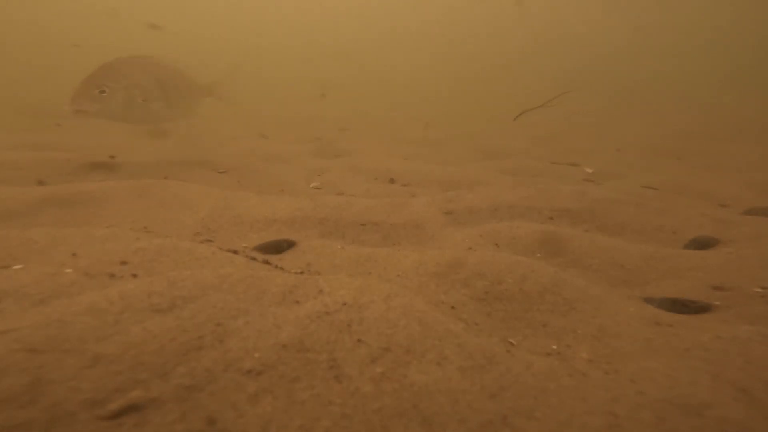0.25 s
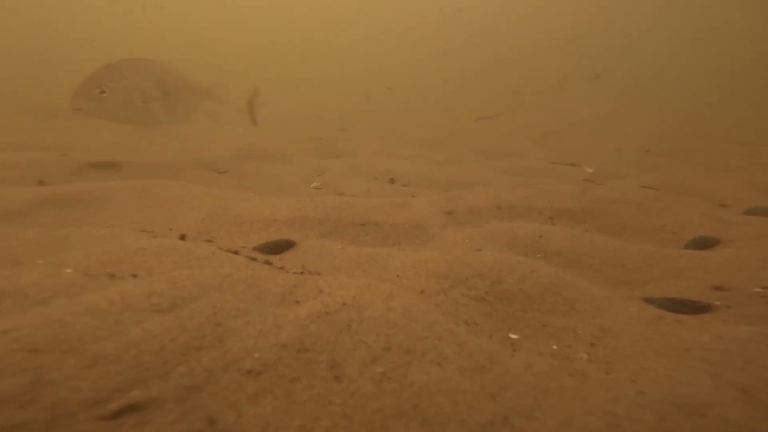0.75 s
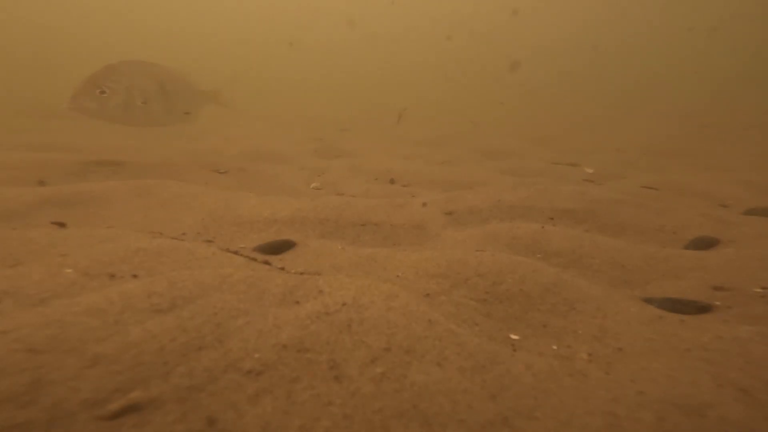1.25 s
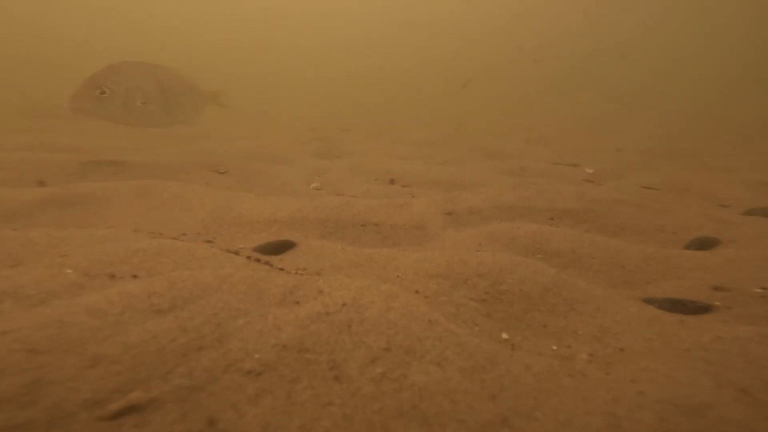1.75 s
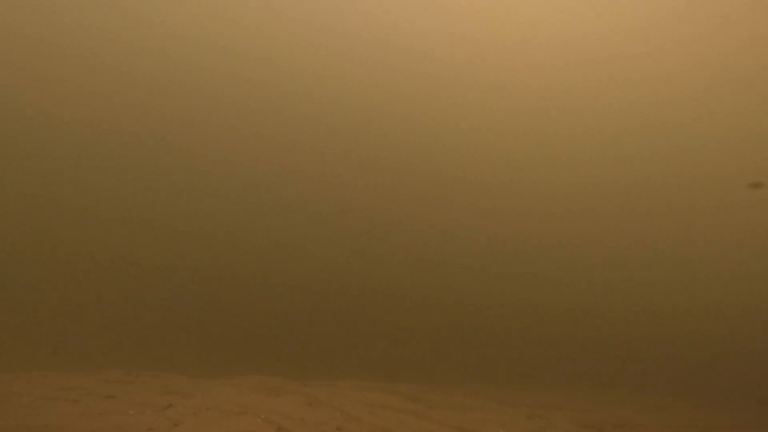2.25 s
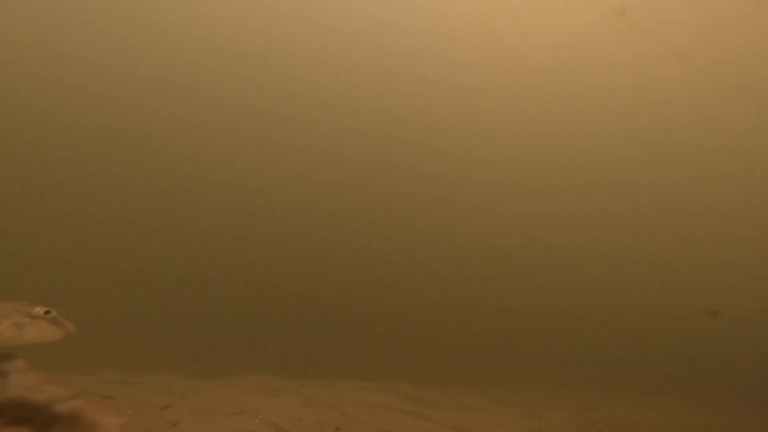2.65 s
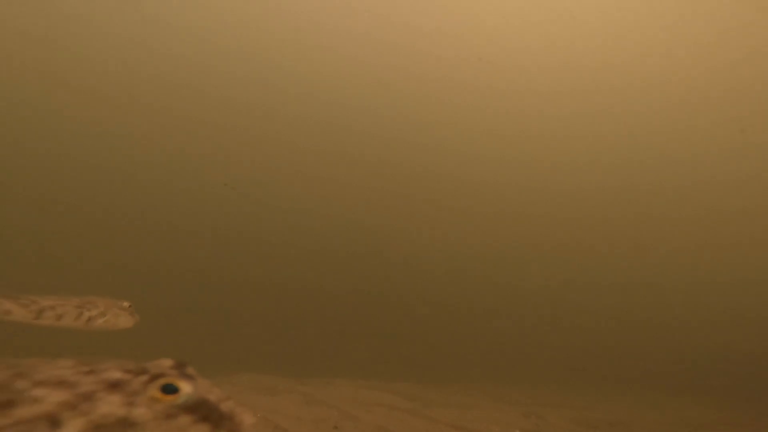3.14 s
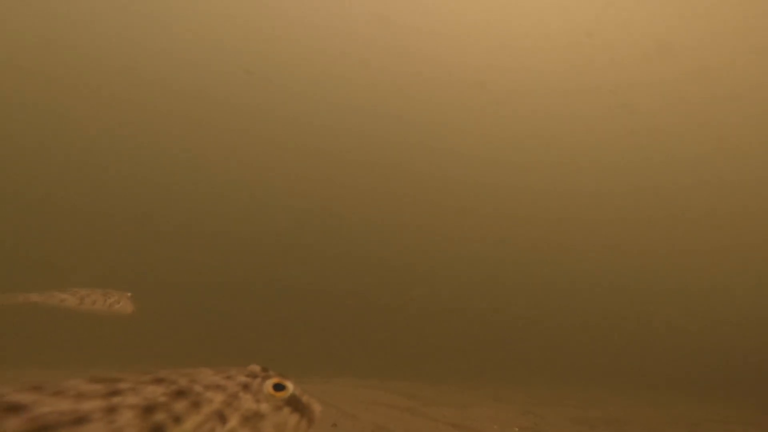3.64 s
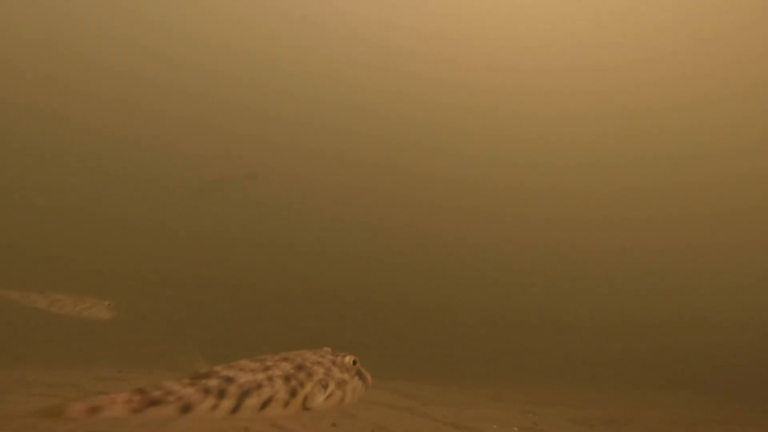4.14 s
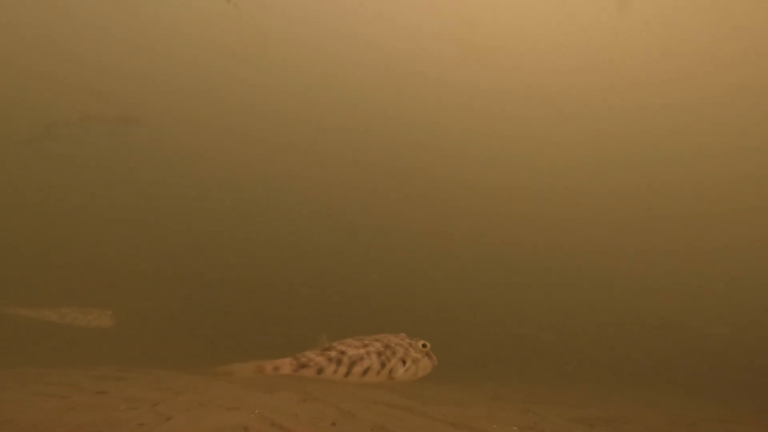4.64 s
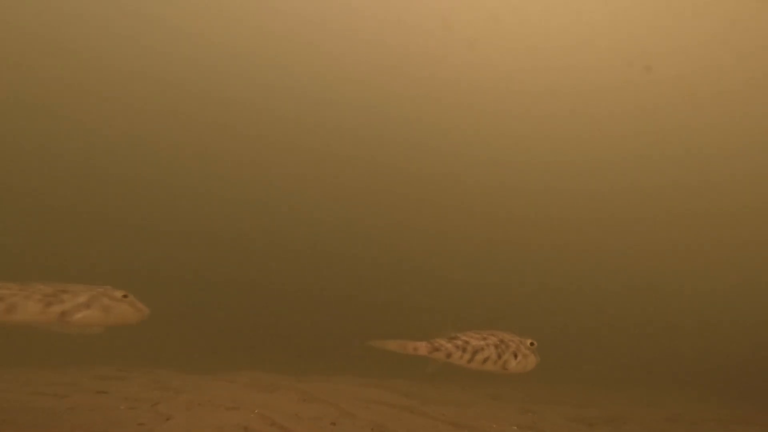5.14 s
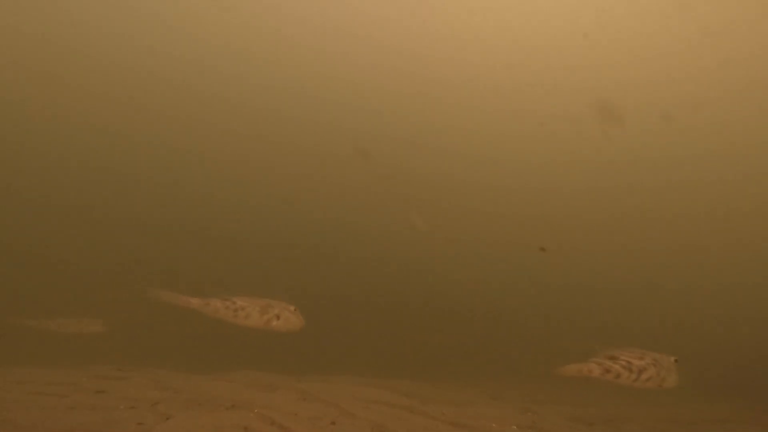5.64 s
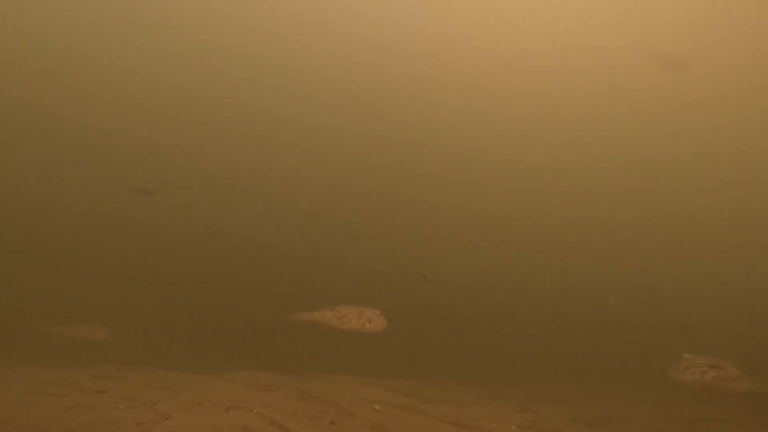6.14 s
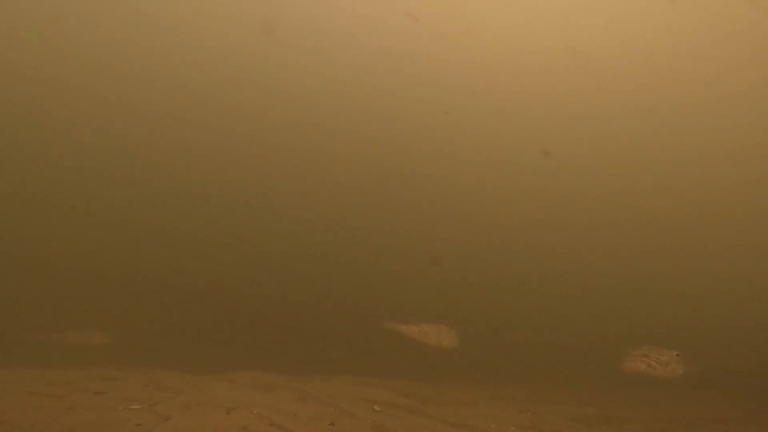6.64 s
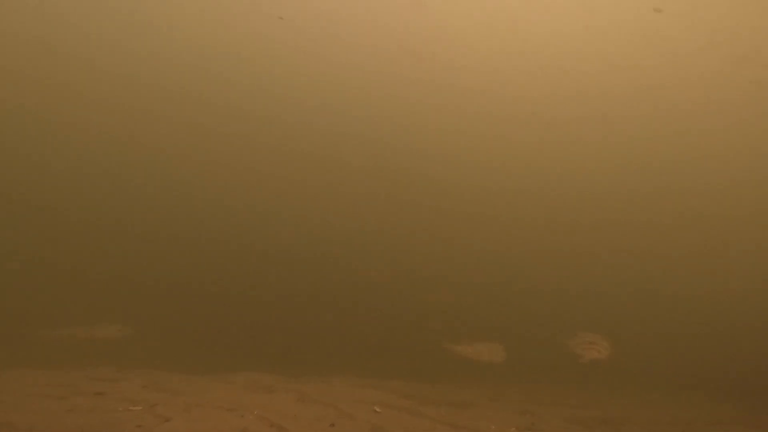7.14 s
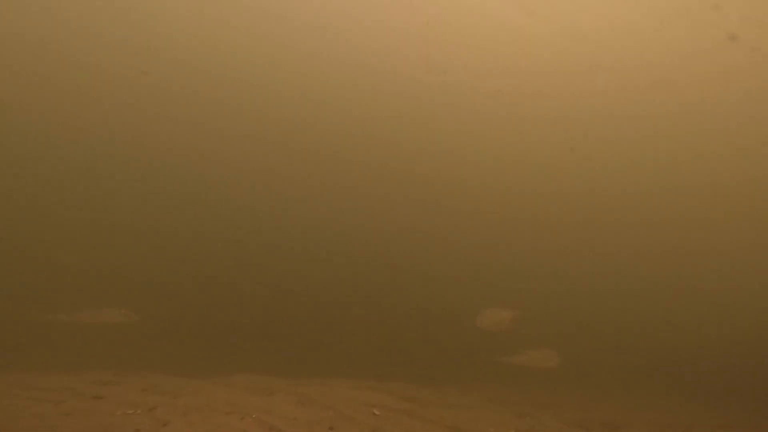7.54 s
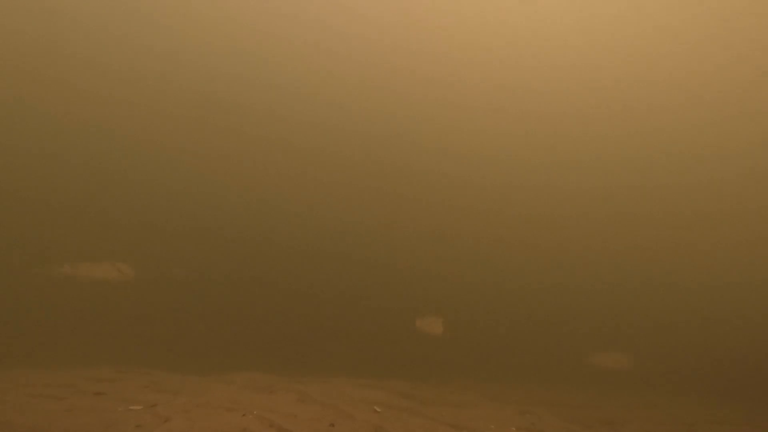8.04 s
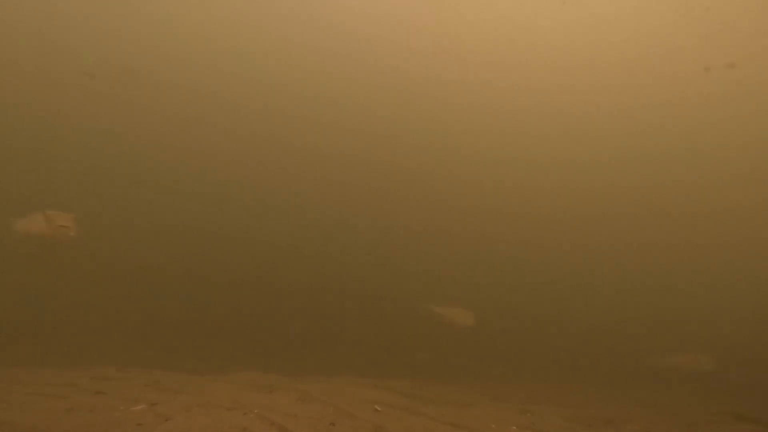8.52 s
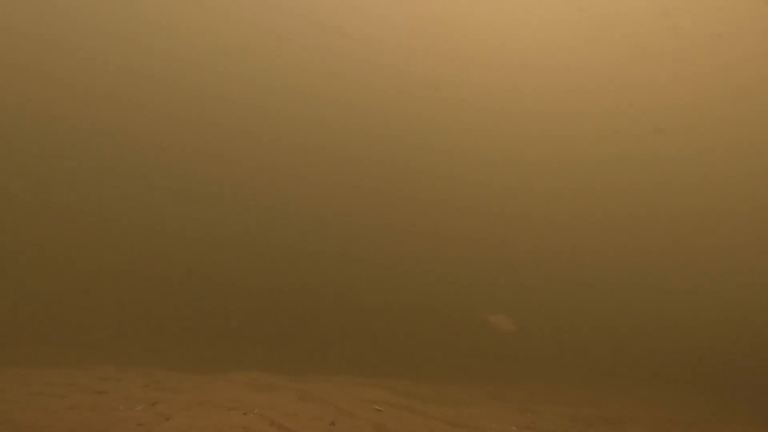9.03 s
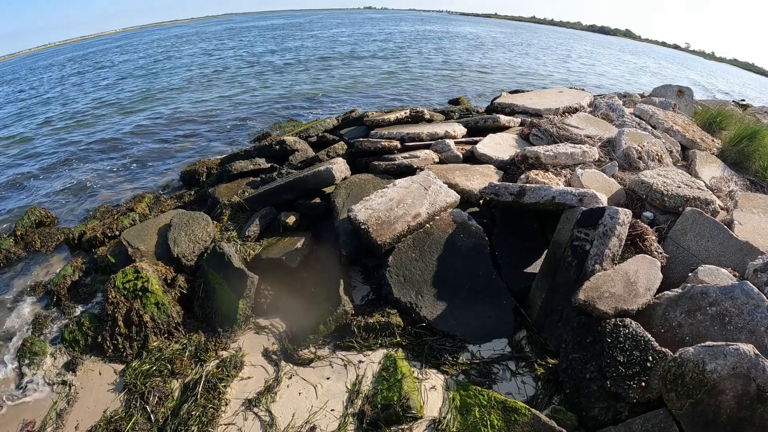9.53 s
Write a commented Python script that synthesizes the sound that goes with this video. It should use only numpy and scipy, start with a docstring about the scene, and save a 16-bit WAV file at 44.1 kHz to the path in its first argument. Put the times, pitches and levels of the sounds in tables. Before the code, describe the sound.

A submerged microphone hears low water rumble, dull knocks and gritty swishes, before a short gust of wind at the end.

```python
"""On sand under murky water lies a camera housing. Swell rumbles, knocks ring its air cavity, grit
excites the resonances of its shell, a low hum drones and the electronics tick faintly. Three scenes
follow abruptly: a strong current in mono, calm water heard in stereo through two ports in the shell,
then, after a short silence, wind on the shore, whose hiss darkens as a low-pass closes."""
import sys
import numpy as np
from scipy import signal
from scipy.fft import rfft, irfft, next_fast_len
from scipy.io import wavfile
from scipy.ndimage import uniform_filter1d, map_coordinates

SR = 44100
rng = np.random.default_rng(int(sys.argv[2]) if len(sys.argv) > 2 else 0)


def waveform_to_disk(signal):
    """Save audio, clipped to [-1, 1], as 16-bit WAV at the path in sys.argv[1]."""
    frames = np.transpose(np.atleast_2d(signal))
    scaled = np.clip(frames, -1, 1) * 32767
    samples = np.round(scaled).astype(np.int16)
    wavfile.write(sys.argv[1], SR, samples)


N = 431298
T = np.arange(N) / SR
COARSE_T = T[::32]  # time grid for slow curves
CALM_START_S, CALM_END_S = 2.18782, 9.14474


# Each row: time in seconds, swell level in dB, relative hum level in dB.
CURRENT_LEVELS = [(0.0, -38, -38), (0.1, -24.5, -37.5), (0.33, -36, -39.5), (0.47, -24, -33.5),
                  (0.84, -33.5, -34), (0.89, -25, -41), (0.95, -28, -31.5), (1.93, -32.5, -36),
                  (1.99, -21.5, -38), (2.08, -38, -36), (2.18, -32, -38.5)]
# Two swell spectra (current, calm) and that of the rush. Each row: frequency in Hz, density in dB.
SWELL_SPECTRA = [(5.9, -28), (10, 3), (54, 1), (67, -12), (86, -20.5), (99, -23), (110, -23), (140, -47.5),
                 (240, -120)], [(5.9, -38.5), (10, -0.5), (38, -0.5), (53, 0.5), (91, -11), (110, -5.5),
                 (140, -28.5), (240, -120)]
RUSH_SPECTRUM = [(74, -28), (125, -4.5), (211, -12.5), (296, -14), (387, -19), (430, -25.5), (490, -21),
                 (631, -29), (791, -27), (933, -38.5), (1000, -55), (1300, -72), (2200, -120)]
# Each row: centre in Hz, width in Hz, gain in dB.
RUSH_RESONANCES = [(154.4, 8.3, 6.5), (195, 4.2, 3.5), (241, 11, 3.5), (352, 10, 1), (397, 10, 5.5),
                   (501, 12, 5.5)]

def current():
    """Flow noise: a strong current gives a low swell and a broad rush with narrow resonances."""
    swell_db = curves(CURRENT_LEVELS)[0]
    rush = resonate(noise(RUSH_SPECTRUM, lumps_db=.7, rate=19), RUSH_RESONANCES)
    return amp(swell_db) * noise(SWELL_SPECTRA[0], lumps_db=.5, rate=7) + amp(-36) * rush


# Each row: time in seconds, base level of the swell in dB.
CALM_LEVELS = [(2.19, -28.5), (2.44, -45), (2.56, -31), (2.71, -39.5), (3.0, -29.5), (3.47, -41),
               (4.3, -28), (4.55, -40.5), (4.82, -36), (5.38, -33), (5.42, -40), (5.77, -28.5),
               (5.98, -42.5), (6.12, -31), (7.01, -34.5), (7.03, -22), (7.12, -32), (8.15, -31.5),
               (8.21, -40.5), (8.38, -28.5), (8.63, -36.5), (8.75, -24.5), (8.89, -36), (9.14, -31)]

def calm_swell(stir_db):
    """Pressure fluctuation: a slow rumble whose part above about 60 Hz rises with the sloshing."""
    swell = noise(SWELL_SPECTRA[1], lumps_db=1, rate=15)
    chop = filtered(swell, lambda hz: 1 / (1 + (59.6 / (hz + 1)) ** 6))
    chop_db = 1 + .76 * uniform_filter1d(stir_db, size=SR // 3)
    return amp(curves(CALM_LEVELS)[0]) * (swell + chop * (amp(chop_db) - 1))


# Each row: start in seconds, cavity level in dB, cavity pitch in Hz, wall level in dB,
# thud level in dB. The levels are relative.
DULL_KNOCKS = [(1.597, -32.5, 750, -23, -18.5), (1.605, -28.5, 776, -49, -21), (2.214, -28, 884, -43, -40),
               (2.246, -32, 810, -29.5, -30), (2.36, -43, 685, -32.5, -51), (2.381, -37, 860, -41, -47),
               (2.581, -36, 780, -32.5, -39), (2.614, -38, 720, -38, -36), (2.731, -36, 895, -56, -53),
               (2.756, -44, 780, -39.5, -45), (3.095, -40, 886, -37, -48), (3.134, -28, 844, -25.5, -44),
               (3.415, -29, 700, -36, -29.5), (3.443, -21.5, 860, -27.5, -22), (3.486, -40, 764, -40, -37),
               (3.516, -30.5, 856, -56, -55), (3.551, -37.5, 820, -54, -48), (3.615, -22.5, 874, -54, -51),
               (3.671, -32, 900, -30, -43), (3.773, -32.5, 850, -50, -40), (3.85, -32, 862, -49, -35),
               (4.18, -37, 824, -48, -32.5), (4.428, -27.5, 920, -55, -45), (4.81, -42, 880, -63, -59),
               (5.17, -42, 810, -47, -55), (5.265, -41, 840, -42.5, -55), (5.525, -32, 880, -56, -58),
               (5.615, -44, 845, -42, -51), (5.764, -44, 870, -53, -38), (6.013, -36.5, 840, -70, -58),
               (6.102, -33.5, 860, -63, -65), (6.47, -34, 880, -39, -59), (6.588, -30, 883, -40.5, -32.5),
               (6.609, -24.5, 864, -28, -28.5), (6.614, -13, 830, -28.5, -15.5),
               (6.62, -23.5, 900, -42.5, -41), (6.654, -30, 850, -62.5, -48.5), (6.724, -32, 940, -37, -26),
               (6.738, -35.5, 916, -45, -42), (6.899, -31.5, 790, -28, -44), (6.988, -23.5, 896, -48, -53),
               (7.018, -32, 875, -38, -40), (7.041, -34.5, 900, -34, -40.5),
               (7.085, -34.5, 890, -35.5, -42), (7.061, -32.5, 933, -32.5, -29),
               (7.156, -36.5, 854, -42, -37), (7.183, -24, 864, -27, -30), (7.314, -30.5, 880, -33.5, -43),
               (7.347, -33.5, 890, -33, -26), (7.444, -29.5, 905, -39, -30), (7.478, -34.5, 975, -33, -32),
               (7.602, -36, 803, -39, -46), (7.64, -35.5, 874, -31, -42.5), (7.728, -34.5, 880, -40, -46),
               (7.768, -28, 805, -36, -28), (7.785, -33, 870, -31, -36), (7.814, -32, 905, -27.5, -50),
               (8.028, -33.5, 843, -45.5, -46.5), (8.369, -32.5, 913, -40, -46),
               (8.607, -33, 850, -44, -32), (8.637, -29, 870, -41, -50), (8.749, -23, 860, -46.5, -37.5),
               (8.843, -29, 695, -45, -33.5), (8.903, -33.5, 880, -56.5, -61),
               (8.909, -11, 887, -59.5, -57), (8.921, -32.5, 810, -62, -57),
               (9.091, -30.5, 820, -35, -55.5), (9.139, -31, 917, -38.5, -51)]
# Means, then standard deviations, of the same columns without the start.
FAINT_KNOCK_SPREAD = (-38, 842, -53, -48), (-0.5, 45, 7.5, 3.5)
# Each row: mode frequency in Hz, relative level in dB, time to decay by 60 dB in seconds.
WALL_MODES = [(506.4, 2, 0.029), (420, -4.5, 0.034)]
THUD_MODES = [(184.7, -0.32, 0.055), (265, -1.4, 0.033)]

def knocks():
    """Modal ringing: a soft blow swells and fades in the air cavity and rings the wall and body."""
    out, t = np.zeros(N + SR), np.arange(SR // 12) / SR
    rows = DULL_KNOCKS + faint_blows(*FAINT_KNOCK_SPREAD, count=60)
    chance = rng.standard_normal((len(rows), 2, 5))
    for (start, db, hz, wall_db, thud_db), (gains, shifts) in zip(rows, chance):
        knock = amp(db + .5) * pulse(t, peak_s=.0033) * np.sin(2 * np.pi * hz * t + 3 * shifts[-1])
        modes = [(f, wall_db + mode_db, t60) for f, mode_db, t60 in WALL_MODES]
        modes += [(f, thud_db + mode_db, t60) for f, mode_db, t60 in THUD_MODES]
        for (f, level_db, t60), gain, shift in zip(modes, gains, shifts):
            rise = (1 - np.exp(-t * f / 1.18)) ** 2
            decay = amp(level_db + 7.5 + 2 * gain - 60 * t / t60)
            knock += rise * decay * np.sin(2 * np.pi * f * (1 + .068 * shift) * t + 3 * shift)
        out[round((start - .0015) * SR):][:len(t)] += knock
    # The cavity passes little above its resonance.
    return filtered(out[:N], lambda hz: 1 / (1 + (hz / 1020) ** 14))


# Each row: start in seconds, then the peaks of lid, rim and click in dB.
GRAIN_HITS = [(1.003, -34.5, -55, -48), (1.007, -37.5, -55, -41), (1.317, -35, -54, -51),
              (1.324, -37, -51, -65), (1.598, -27.5, -48, -58), (1.6015, -23.5, -36, -32),
              (1.6085, -25.5, -30, -38), (1.619, -33.5, -43, -49), (1.874, -43, -52, -50),
              (2.051, -39, -57, -57), (2.246, -49, -62, -73), (2.381, -59, -77, -70),
              (2.529, -53, -80, -80), (2.579, -58, -76, -78), (2.613, -51.5, -60, -66),
              (2.731, -58, -68, -74), (2.757, -64, -75, -78), (2.955, -70, -73, -78), (3.1, -55, -70, -72),
              (3.112, -52, -61, -69), (3.178, -57.5, -64, -74), (3.442, -32, -58, -38.5),
              (3.449, -43, -54, -55), (3.772, -55, -81, -61), (3.831, -49.5, -74, -81),
              (3.852, -53, -80, -75), (4.018, -53.5, -82, -72), (4.145, -54, -83, -69),
              (4.181, -50, -82, -66), (4.198, -55, -80, -76), (4.229, -55, -77, -66),
              (4.248, -49, -67, -68), (4.496, -59, -76, -72), (4.524, -53, -66, -63),
              (4.538, -53, -67, -64), (5.008, -67, -80, -58), (5.117, -57, -80, -76),
              (5.261, -62, -63, -61), (5.37, -59, -82, -74), (5.858, -54, -78, -72), (5.901, -56, -67, -61),
              (5.911, -48.5, -69, -64), (5.936, -56, -74, -62), (6.382, -53, -81.5, -72),
              (6.553, -50.5, -65, -59.5), (6.613, -34, -54, -43.5), (6.617, -34.5, -46, -44),
              (6.626, -46, -61, -58), (6.636, -46.5, -66, -62), (6.646, -50.5, -65, -65),
              (6.723, -51, -64, -60), (6.739, -51, -66, -64), (6.81, -56, -76, -65), (6.986, -50, -80, -62),
              (7.018, -51, -71, -70), (7.041, -56, -78, -71), (7.085, -56, -74, -72),
              (7.183, -55, -73, -71), (7.342, -55, -74, -72), (7.38, -53, -70, -56), (7.445, -56, -74, -68),
              (7.767, -49.5, -75, -62), (7.815, -57, -74, -71), (7.947, -56, -81, -61),
              (8.608, -51, -74, -64), (8.749, -49, -68, -57), (8.843, -52, -79, -62.5),
              (8.91, -35.5, -52, -51), (9.091, -49, -64, -63)]
# Means, then standard deviations, of those three peaks in dB.
FAINT_HIT_SPREAD = (-60.5, -82, -76.5), (0, 4, 4)
# Each row: centre in Hz, width in Hz, relative weight in dB.
LID_RESONANCES = [(1839, 370, 0), (2157, 110, -2)]
RIM_RESONANCES = [(2850, 720, -5), (3365, 380, -1.5), (3950, 320, -8)]
CLICK_RESONANCES = [(5250, 900, -5), (6140, 700, 3), (7500, 1300, -4), (10050, 1500, -6)]
FLANK_RESONANCES = [(1060, 380, -1.5), (1485, 270, -0.5)]
SNAP_RESONANCES = [(2420, 970, -0.5), (4650, 3700, 1), (10800, 6500, -7.5)]

def cracks():
    """Impact excitation: a hard grain rings lid, rim and flank; the hardest also snap broadly."""
    out, t = np.zeros(N + SR), np.arange(2048) / SR
    hz = np.fft.rfftfreq(len(t), 1 / SR)
    rows = GRAIN_HITS + faint_blows(*FAINT_HIT_SPREAD, count=50)

    def scatter(db):
        return amp(db * rng.standard_normal((len(rows), 1)))

    def response(peaks):
        """Resonators add with alternating sign; each grain excites them differently."""
        return sum((-1) ** k * amp(db) * scatter(1.5) * 1j * hz * width
                   / (centre ** 2 - hz ** 2 + 1j * hz * width)
                   for k, (centre, width, db) in enumerate(peaks))

    burst_t60 = .004 * scatter(4.5)
    envelope = amp(-60 * t / burst_t60) * (1 - np.exp(-t / .0002))
    bursts = rfft(rng.standard_normal((len(rows), len(t))) * envelope)
    parts = LID_RESONANCES, RIM_RESONANCES, CLICK_RESONANCES, FLANK_RESONANCES
    spectra = [bursts * response(peaks) ** 3 for peaks in parts]
    snap = response(SNAP_RESONANCES) ** 2 * np.exp(-2j * np.pi * hz * .0018)  # one push, 1.8 ms in
    rings = irfft(np.array(spectra + [snap])) * np.cos(np.pi / 2 * t / t[-1]) ** 4
    rings /= np.abs(rings).max(axis=-1, keepdims=True)
    for k, (start, lid_db, rim_db, click_db) in enumerate(rows):
        flank_db = lid_db - 6 + .23 * (lid_db + 38)
        snap_db = click_db + 1.5 + .4 * (click_db + 38.5)
        gains = amp([lid_db, rim_db, click_db, flank_db, snap_db])
        out[round((start - .001) * SR):][:len(t)] += gains @ rings[:, k]
    return out[:N]


# Each row: time in seconds, wind level in dB, relative hiss level in dB.
SHORE_LEVELS = [(9.2, -75.5, -95), (9.23, -48, -76.5), (9.282, -30, -55.5), (9.364, -27, -51.5),
                (9.424, -25, -65.5), (9.572, -23.5, -54), (9.766, -24, -52), (9.78, -24.5, -60)]
# Each row: frequency in Hz, density in dB.
WIND_SPECTRUM = [(7, -35), (12, 4.5), (43, -1.5), (107, -7), (135, -14), (205, -3.5), (240, -17.5),
                 (424, -21), (854, -26.5), (982, -24.5), (1430, -36.5), (2070, -54), (3150, -54),
                 (4200, -66.5), (6000, -74), (9000, -101), (12000, -120)]

def wind():
    """Turbulence: moving air builds to a low, uneven rumble."""
    return amp(curves(SHORE_LEVELS)[0]) * noise(WIND_SPECTRUM, lumps_db=1.5, rate=29)


# Each row: frequency in Hz, density in dB.
WIND_HISS_SPECTRUM = [(780, -44), (1300, -2.5), (2000, 0.5), (3000, -8.5), (4000, -11.5), (5000, -10.5),
                      (7000, -14.5), (7800, -18.5), (12000, -34)]
# Each row: time in seconds, upper edge of the hiss in Hz.
WIND_HISS_CUTOFF = [(9.2, 8000), (9.33, 7700), (9.37, 4940), (9.41, 3200), (9.43, 1500), (9.78, 1510)]
# Each row: time in seconds, level in dB.
FIZZ_LEVELS = [(9.2, -100), (9.3, -84), (9.39, -79), (9.43, -101), (9.78, -93.5)]

def wind_hiss():
    """Filter sweep: the wind's hiss darkens as a low-pass closes, while a thin fizz lingers."""
    hz, t, spectra = signal.stft(noise(WIND_HISS_SPECTRUM), SR, nperseg=512)
    cutoff_hz = np.interp(t, *np.transpose(WIND_HISS_CUTOFF))
    hiss = signal.istft(spectra / (1 + (hz[:, None] / cutoff_hz) ** 14), SR, nperseg=512)[1][:N]
    fizz = noise([(6000, -44), (8000, -8), (11000, -5), (14000, -23), (16000, -34)])
    return amp(curves(SHORE_LEVELS)[1] + 8.5) * hiss + amp(curves(FIZZ_LEVELS)[0]) * fizz


# Each row: time of the peak in seconds, level in dB.
WATER_PUSHES = [(2.24, -42.5), (2.571, -59), (2.86, -38.5), (3.15, -41), (3.44, -45), (3.82, -42.5),
                (4.38, -44.5), (5.02, -52), (5.39, -62), (6.49, -56.5), (6.61, -44.5), (6.78, -47.5),
                (7.031, -47), (7.21, -43), (7.38, -41.5), (7.651, -46), (7.86, -46), (8.07, -48.5),
                (8.38, -43), (8.75, -44.5), (9.0, -45.5)]
# Each row: frequency in Hz, density in dB.
SURGE_SPECTRUM = [(74, -27.5), (125, -3), (136, 6.5), (145, -8.5), (193, -5), (300, -21), (390, -48),
                  (660, -120)]

def surges(slope_db_per_s=150, floor_db=-55.5):
    """Exponential growth and decay: short, low pushes of water rise above a steady floor."""
    pushes = sum(amp(db - slope_db_per_s * np.abs(COARSE_T - s)) for s, db in WATER_PUSHES)
    envelope = np.interp(T, COARSE_T, pushes) + amp(floor_db)
    return envelope * noise(SURGE_SPECTRUM, lumps_db=3.5, rate=25)


# Each row: time in seconds, base level of the sloshing in dB.
SLOSH_LEVELS = [(2.2, -48.5), (2.5, -58.5), (3.5, -49), (3.8, -49), (4.05, -59), (5.0, -57), (6.0, -61),
                (6.65, -57.5), (6.78, -46.5), (6.9, -55.5), (7.3, -49), (7.9, -52.5), (8.3, -56),
                (9.0, -49.5), (9.14, -62.5)]
# Each row: centre in seconds, half length in seconds, rise of the scraping in dB.
SAND_SWISHES = [(2.238, 0.036, 6.5), (2.39, 0.011, 7.5), (2.564, 0.021, 7.5), (2.865, 0.036, 6.5),
                (3.13, 0.044, 10), (3.406, 0.04, 5.5), (3.672, 0.027, 5), (6.617, 0.043, 9),
                (6.734, 0.02, 8), (6.793, 0.021, 2.5), (6.895, 0.03, 8.5), (7.044, 0.044, 7.5),
                (7.188, 0.034, 9), (7.343, 0.039, 8.5), (7.475, 0.05, 10), (7.628, 0.033, 6),
                (7.791, 0.055, 8.5), (7.96, 0.018, 3.5), (8.371, 0.029, 5), (8.651, 0.026, 7.5),
                (8.993, 0.021, 8)]
# Each row: frequency in Hz, density in dB.
SLOSH_SPECTRUM = [(170, -18), (290, -10), (361, -8.5), (430, -7), (495, -3.5), (570, -6), (650, -12.5),
                  (840, -50.5), (1430, -120)]
SCRAPE_SPECTRUM = [(380, -41.5), (640, -12.5), (846, -1.5), (889, 0.5), (949, -7.5), (1040, -23),
                   (1300, -29.5), (1690, -63), (2860, -120)]
GRIT_SPECTRUM = [(720, -41.5), (1200, -6), (1400, -4.5), (1830, 1), (2150, -6.5), (2700, -22),
                 (3300, -15.5), (4200, -28), (5200, -24), (6050, -24), (7000, -27.5), (8500, -36),
                 (10000, -35), (11500, -47), (14375, -120)]

def sloshing_sand(slosh_db, stir_db):
    """Friction: water sweeps sand along the shell, so slosh, scrape and grit rise together."""
    swishes = sum(db * np.exp(-((COARSE_T - s) / half) ** 4) for s, half, db in SAND_SWISHES)
    sweep_db = np.interp(T, COARSE_T, swishes)
    drift_db = 1.6 * wobble(11)  # sand comes in uneven drifts
    slosh = noise(SLOSH_SPECTRUM, lumps_db=3, rate=40, grains=.41)
    scrape = noise(SCRAPE_SPECTRUM, lumps_db=2.5, rate=36, grains=.49)
    grit = noise(GRIT_SPECTRUM, lumps_db=1.5, rate=44, grains=.75)
    return (amp(slosh_db + 1.33 * sweep_db + drift_db) * slosh
            + amp(-48.5 + .21 * stir_db + sweep_db + drift_db) * scrape
            + amp(-71.5 + .071 * stir_db + .86 * sweep_db + 1.3 * drift_db) * grit)


# Each row: start in seconds, first pitch in Hz, peak in dB.
LARGE_BUBBLES = [(3.786, 335, -38), (3.839, 325, -42), (4.325, 167, -35.5), (4.374, 191, -37),
                 (5.0, 172, -35.5)]

def gurgles(peak_s=.014):
    """Bubble resonance: each tone swells and fades while its pitch climbs."""
    out, t = np.zeros(N), T[:SR // 4]
    for start, hz, db in LARGE_BUBBLES:
        phase = 2 * np.pi * hz * t * (1 + .034 * t / (4 * peak_s))  # up 3.4 % at twice the peak time
        out[round(start * SR):][:len(t)] += amp(db) * pulse(t, peak_s) * np.sin(phase)
    return out


# Each row: frequency in Hz, density in dB.
SHOWER_SPECTRUM = [(2000, -38), (2700, -10), (3600, -2), (4600, -11), (6100, 2), (7500, -16), (9000, -26),
                   (12000, -70)]

def sand_shower(start_s=6.618, t60=.14):
    """Exponential decay: fine sand shaken loose by a hard knock hisses and dies away."""
    envelope = (T > start_s) * amp(-63 - 60 * np.abs(T - start_s) / t60)
    return envelope * noise(SHOWER_SPECTRUM, lumps_db=2, rate=110)


def hum(db, sway_db, hz=119.3):
    """Frequency and amplitude modulation: a low tone wavers at random."""
    phase = 2 * np.pi * np.cumsum(hz + 1.3 * wobble(10)) / SR
    return amp(db + sway_db * wobble(4) + 1.5 * wobble(15)) * np.sqrt(2) * np.sin(phase)


# Each row: pitch in Hz, level in dB, start in seconds, end in seconds.
DRONE_TONES = [(291.2, -46.5, -.2, 2.3), (241, -46.5, .05, 0.58), (471, -52.5, .25, 1.0),
               (510, -53.5, .5, 1.07), (597, -59, 0.46, 1.4), (392, -45, 1.326, 1.59),
               (2120, -60.5, 0.75, 1.43), (1780, -57.5, 1.74, 2.12), (2125, -66, 1.9, 2.6),
               (920, -61, 1.7, 2.6)]

def drone():
    """Superposition: weak tones come and go in the current, each wavering on its own."""
    t = T[T < CALM_START_S]
    out = np.zeros(N)
    for hz, db, start, end in DRONE_TONES:
        level = amp(db + 4.2 * wobble(6.22, t))
        fade = np.clip(np.minimum(t - start, end - t) / .049, 0, 1)
        phase = 2 * np.pi * np.cumsum(hz + 1.5 * wobble(5, t)) / SR
        out[:len(t)] += level * fade * np.sin(phase)
    return out


# Each row: frequency in Hz, density in dB.
HISS_SPECTRUM = [(570, -43), (950, -2.5), (1280, -8), (1600, -11), (2050, 1), (2720, -20.5), (3350, -14),
                 (4200, -22), (4900, -19), (6200, -18.5), (7500, -26), (8700, -35), (10000, -34),
                 (11500, -64), (14375, -120)]
# Each row: centre in Hz, width in Hz, gain in dB.
SHELL_RESONANCES = [(1123, 34, 3.5), (1290, 18, 7.5), (1830, 20, 9.5), (2120, 14, 6), (3150, 76, 5.5),
                    (3350, 46, 6.5), (4840, 58, 9.5), (5480, 46, 7.5), (6140, 120, 6)]

def shell_hiss():
    """Resonant filtering: the shell colours the steady hiss of the current."""
    hiss = resonate(noise(HISS_SPECTRUM, lumps_db=.5, rate=30, grains=.2), SHELL_RESONANCES)
    return amp(-55 + .27 * wobble(29)) * hiss


# One row for the current, one for calm water. Each row: two tick times as fractions of a cycle.
TICK_PHASES = [(.035, .34), (.28, .585)]

def ticks(phases, db, cycle_hz=59.94):
    """Crosstalk: the electronics leak a short, high blip twice in each cycle."""
    cycle = T * cycle_hz % 1
    gate = sum(np.exp(-((cycle - phase) / .021) ** 2) for phase in phases)
    hiss = noise([(7000, -44.5), (9000, 10.5), (10800, -5), (11500, -66)])
    blip = np.sin(2 * np.pi * 9890 * T) + .5 * hiss
    return amp(db + .89 * wobble(40)) * gate * blip


# Each row: frequency in Hz, density in dB.
PREAMP_SPECTRUM = [(2000, -38.5), (2700, -9), (3300, -8), (4200, -11), (5200, -9.5), (6050, -1),
                   (7000, -4.5), (8500, -11.5), (10000, -13), (11500, -32), (14000, -66.5)]

def preamp_hiss():
    """Electronic noise: the preamplifier adds a faint, steady hiss."""
    return amp(-83.5) * noise(PREAMP_SPECTRUM)


# Left against right. Each row: frequency in Hz, level difference in dB, phase lead in radians.
PORT_DIFFERENCES = [(60, -3, 0.1), (130, 0, -0.07), (250, -4.5, 0.6), (500, -8, 0.9), (700, -11.5, 1),
                    (870, -17, 1.45), (1000, -12.5, 1), (1120, -10, -1.5), (1350, -8.5, -2),
                    (1800, -0.5, -1.5), (2600, 3, -1.4), (4000, 2, -1.3), (5000, 9, 1.5), (6500, 23, -1),
                    (9000, 29, 2)]
# Sound in antiphase at the ports. Each row: frequency in Hz, density in dB.
SIDE_SPECTRUM = [(10, -12.5), (60, 2), (120, -3.5), (200, -20.5), (400, -36.5), (1000, -40), (1500, -49.5),
                 (2500, -64.5), (4000, -57), (7000, -60), (10500, -73.5), (12000, -100)]
# Each row: frequency in Hz, share that wanders between the ports in dB.
WANDERING_SHARE = [(30, -10), (70, -17), (160, -8), (240, -18.5), (350, -8), (500, -18.5), (870, -23),
                   (1100, -14), (1600, -10.5), (2200, -13.5), (3500, -7.5), (6000, -8.5), (10000, -14)]

def ports(mid):
    """Level and phase differences: the two ports sit in different pockets of the shell."""
    def response(hz):
        lead = along(PORT_DIFFERENCES, hz, column=2)
        ratio = amp(along(PORT_DIFFERENCES, hz)) * np.exp(1j * lead)
        return 2 / (1 + ratio) * np.array([ratio, np.ones(len(hz))])

    side = amp(curves(CALM_LEVELS)[0] - 16.5) * noise(SIDE_SPECTRUM)
    side += filtered(mid * wobble(12), lambda hz: amp(along(WANDERING_SHARE, hz)))
    return filtered(mid, response) + side * [[1], [-1]]


def amp(db):
    return 10 ** (np.asarray(db) / 20)


def unit(x):
    return x / np.sqrt(np.mean(x ** 2) + 1e-20)


def pulse(t, peak_s):
    """Gamma envelope: a quadratic rise to 1, then an exponential tail."""
    return (t / peak_s * np.exp(1 - t / peak_s)) ** 2


def along(points, hz, column=1):
    """Interpolation of one column over log frequency."""
    columns = np.transpose(points)
    return np.interp(np.log(hz + 1), np.log(columns[0] + 1), columns[column])


def curves(rows):
    """Interpolation over time of each column after the first."""
    times, *columns = np.transpose(rows)
    return [np.interp(T, times, column) for column in columns]


def wobble(rate, t=T):
    """Spline interpolation of random values, rate knots a second."""
    knots = rng.standard_normal(int(len(t) * rate / SR) + 4)
    return np.interp(t, t[::32], map_coordinates(knots, [t[::32] * rate]))


def filtered(x, response):
    """Linear filtering: the spectrum of x times a complex response."""
    size = next_fast_len(N + 8192)
    return irfft(rfft(x, size) * response(np.fft.rfftfreq(size, 1 / SR)), size)[..., :N]


def resonate(x, peaks):
    """Resonance: narrow bands of x are lifted and the result is scaled to rms 1."""
    def gain(hz):
        return amp(sum(db * np.exp(-((hz - centre) / width) ** 2) for centre, width, db in peaks))
    return unit(filtered(x, gain))


def noise(spectrum, lumps_db=0., rate=20., grains=0.):
    """Spectral shaping: noise of rms 1, in lumps, with a share of sparse spiky grains."""
    sparse = rng.standard_normal(N) * (rng.random(N) < 150 / SR)
    drive = rng.standard_normal(N) + grains * unit(sparse)
    drive *= amp(lumps_db * wobble(rate))
    return unit(filtered(drive, lambda hz: amp(along(spectrum, hz))))


def faint_blows(mean, scatter, count):
    """Random arrivals: rows of small blows in the calm water."""
    rows = mean + rng.standard_normal((count, len(mean))) * scatter
    return [(start, *row) for start, row in zip(rng.uniform(CALM_START_S, CALM_END_S, count), rows)]


# One row for the end of each underwater scene. Each row: left and right height of the click just before the
# scene changes, full scale 1.
END_CLICKS = [(.09, .08), (.021, .015)]

def scene():
    """Time gating: three scenes sound in turn; each underwater one ends in a sharp click as the scene changes."""
    blows = knocks() + cracks()
    flow = current() + shell_hiss() + hum(curves(CURRENT_LEVELS)[1] - .5, sway_db=.5) + drone()
    flow += ticks(TICK_PHASES[0], db=-72)

    slosh_db = curves(SLOSH_LEVELS)[0]
    stir_db = slosh_db - np.mean(SLOSH_LEVELS, axis=0)[1]
    calm = calm_swell(stir_db) + surges() + sloshing_sand(slosh_db, stir_db) + gurgles()
    calm += sand_shower() + hum(-45, sway_db=3) + ticks(TICK_PHASES[1], db=-78) + preamp_hiss()

    flow_end, calm_end = [np.exp(-np.abs(T - s) / .0015) for s in (CALM_START_S, CALM_END_S)]
    flow = (flow + blows) * (1 - flow_end) + np.outer(END_CLICKS[0], flow_end)
    calm = ports(calm + blows) * (1 - flow_end) * (1 - calm_end) + np.outer(END_CLICKS[1], calm_end)
    underwater = np.where(T < CALM_START_S, flow, calm) * (T < CALM_END_S)
    shore = (wind() + wind_hiss()) * np.clip((T - 9.205) / .044, 0, 1)
    return underwater + shore


def record(dry):
    """Band limiting: nothing above 15.8 kHz passes."""
    return filtered(dry, lambda hz: hz < 15800)


dry = scene()
out = record(dry)
waveform_to_disk(out)
```